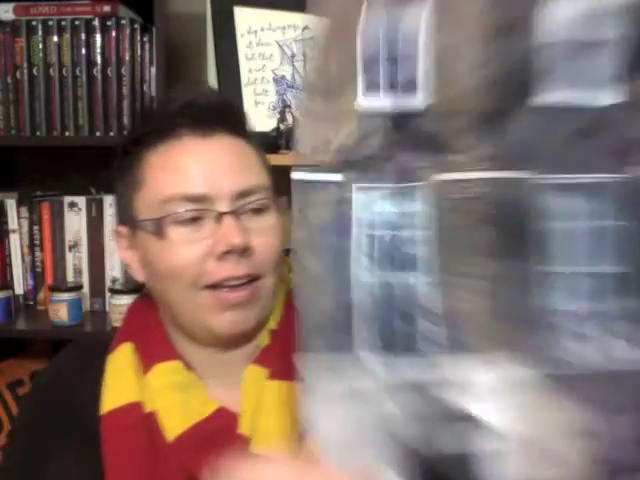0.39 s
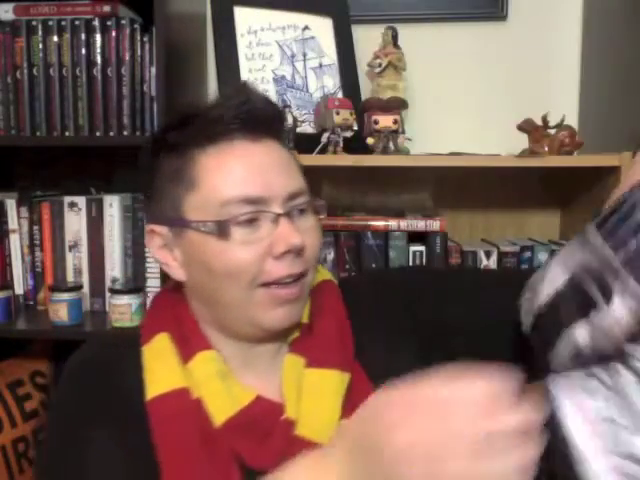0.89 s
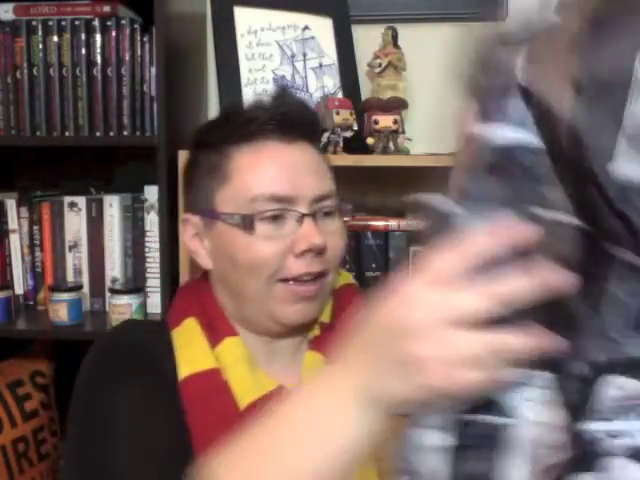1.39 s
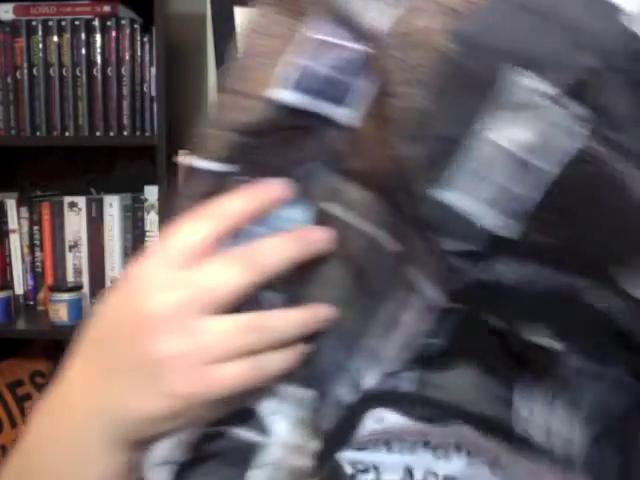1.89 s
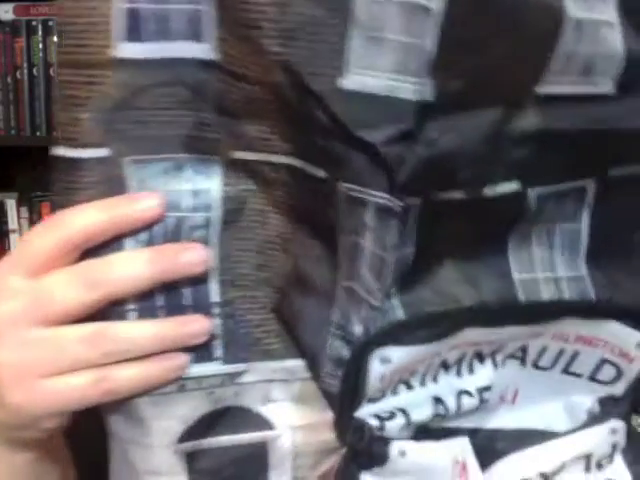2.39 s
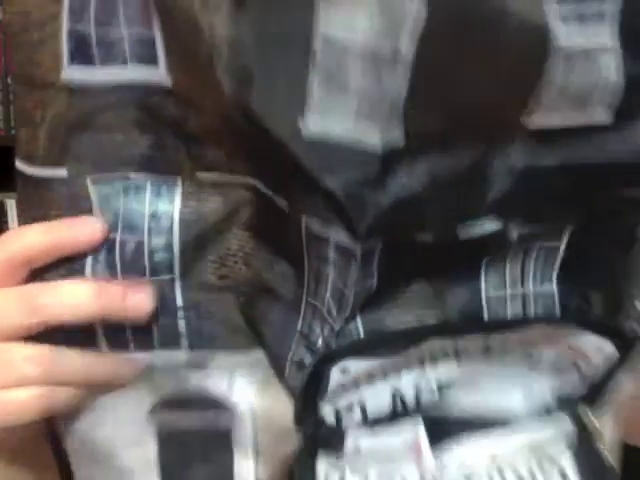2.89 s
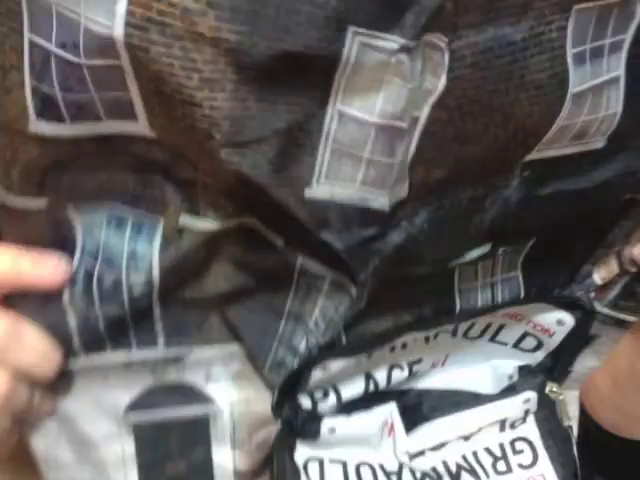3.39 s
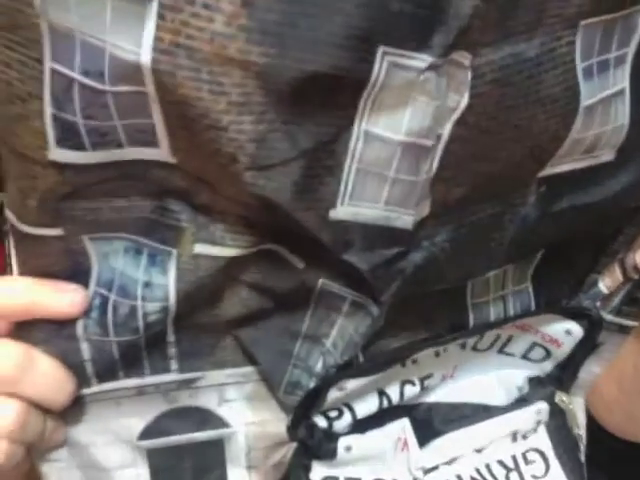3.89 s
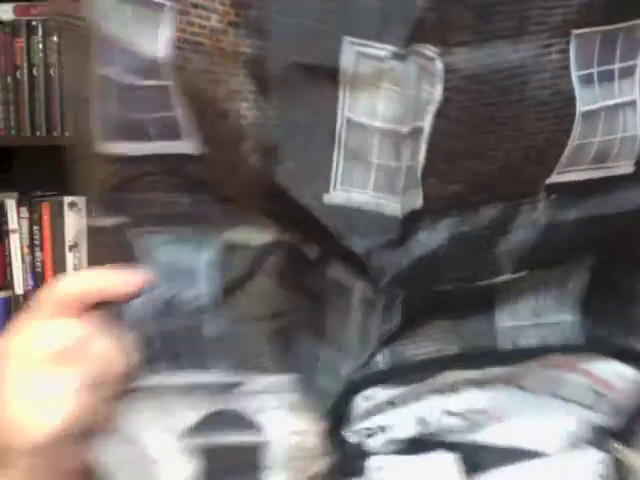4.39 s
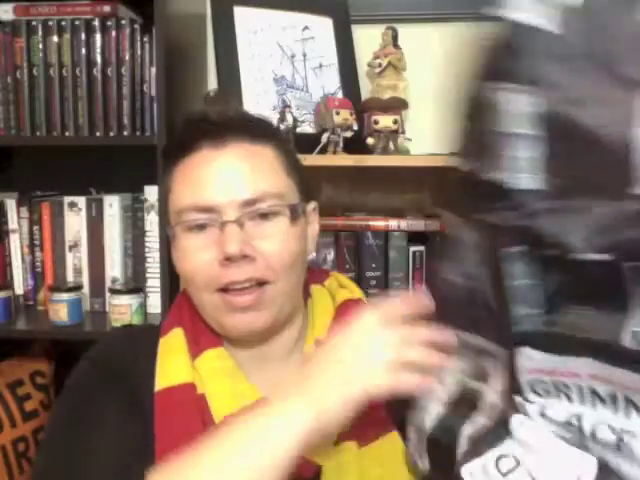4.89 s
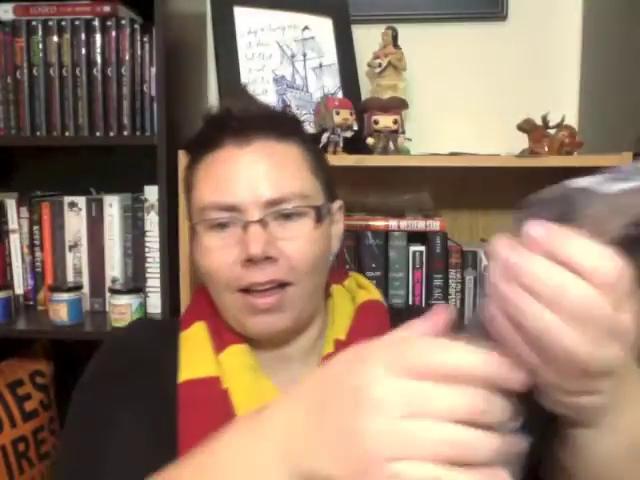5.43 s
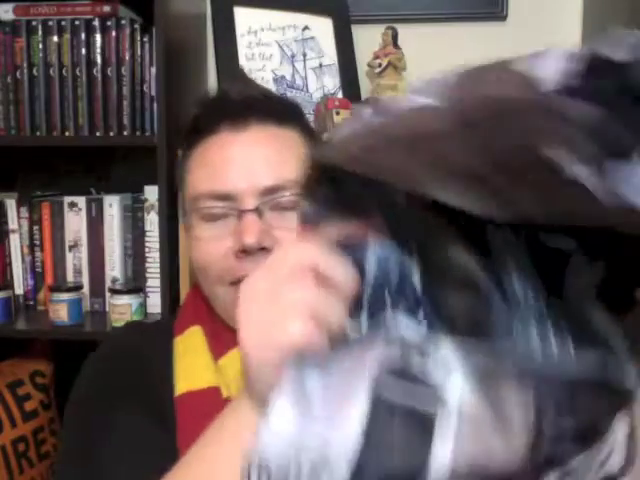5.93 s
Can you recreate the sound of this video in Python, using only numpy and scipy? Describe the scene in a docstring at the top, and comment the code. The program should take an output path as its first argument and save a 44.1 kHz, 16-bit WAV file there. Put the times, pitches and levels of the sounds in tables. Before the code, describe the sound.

Crisp, synthetic-sounding cloth rustles and crinkles near a thin, bass-light microphone indoors. Folds pop and snap, layers hiss over each other and panels give soft low flaps. The handling comes in separate bouts, with short gaps and a long hush just before the last third. Rustling then returns gently and swells into the busiest, loudest crumple, where taut weave chirps upward. Close reflections keep the space small and dry.

```python
"""In a small furnished room, a large stiff fabric bag is unfolded and shaken close to a laptop microphone.
Creases snap over as short rings with cracks and thumps; many small folds crackle as dense tuned grains.
Layers slide on each other with a bright, flickering hiss, and panels flap as low noise.
Now and then the taut weave squeaks on a gliding tone. Changing echoes and faint room noise surround it all."""
import sys
import numpy as np
from scipy import signal
from scipy.io import wavfile
from scipy.ndimage import uniform_filter1d

SR = 44100
rng = np.random.default_rng(int(sys.argv[2]) if len(sys.argv) > 2 else 0)


def unload_audio(sound):
    """Save the sound as a 16-bit wav file, at the path given as the first command line argument."""
    columns = np.transpose(np.atleast_2d(sound))
    # keep every value between -1 and 1, then stretch to whole-number steps
    steps = np.round(np.clip(columns, -1, 1) * 32767)
    wavfile.write(sys.argv[1], SR, steps.astype(np.int16))


def boost(x):
    """Linear amplitude factor 10**(x/20) for a level x in decibels (scalar or array-like)."""
    u = np.asarray(x, float) / 20
    return 10 ** u


N = 266496

# room noise spectrum, relative density: (frequency [Hz], level [dB])
AIR_SPECTRUM = [(30, -9), (125, 17), (250, 4.5), (800, -1), (1700, -4), (3500, -18), (6000, -8.5),
                (10000, -10.5), (17000, -19)]
AIR_DB = -80  # rms at the microphone
# reverb time of the room by band: (frequency [Hz], time to fall 60 dB [s])
WALL_DECAY = [(200, 0.12), (700, 0.12), (2000, 0.22), (5000, 0.2), (12000, 0.23)]
# reflections off nearby surfaces: (nominal delay [s], level [dB])
NEAR_ECHOES = [(.0021, -15.5), (.0054, -26.5), (.0092, -27), (0.015, -21.5)]
# microphone capsule behind its port: (frequency [Hz], gain [dB])
MIC_RESPONSE = [(20, -20.5), (55, -12.5), (120, 1.5), (300, 3), (5000, -1.78), (6800, -5.5), (8200, -9.5),
                (9700, -2), (11500, -4.5), (15700, -2.5), (16100, -21.5), (17200, -54.5)]

# panels that swing: (start [s], length [s], level [dB])
FLAPS_TIMED = [(.41, .2, -79), (.6, 0.032, -68), (1.125, 0.046, -60.5), (1.4, .02, -77), (1.6, 0.13, -53),
               (2.08, 0.042, -52.5), (2.94, .02, -60.5), (3.04, 0.047, -60), (3.15, 0.025, -57),
               (3.74, 0.025, -55.5), (4.59, .02, -60.5), (4.64, 0.35, -68), (4.93, 0.028, -56),
               (5.5, 0.29, -67.5), (5.78, 0.037, -67), (5.9, 0.052, -47)]
# lumps of pushed air, relative density: (frequency [Hz], level [dB])
FLAP_SPECTRUM = [(40, -30), (110, -6), (200, .1), (400, -6), (900, -30)]
SWING_S, REST_DB_PER_S = 0.0094, 300.5  # rise time, fall after the end
STIR_DB, STIR_PER_DB = -71, 0.94  # panels stir with any crumpling: level at -56 dB of large folds, slope

# one layer sliding along another: (start [s], length [s], hiss at the start [dB], hiss at the end [dB])
SLIDE_STROKES = [(0, .19, -54, -66), (.335, 0.22, -59, -58), (.59, .02, -54, -63), (.69, 0.029, -60, -57),
                 (.748, .04, -49, -61), (.855, .03, -64, -72), (.95, .03, -55, -70),
                 (1.06, 0.021, -71, -48), (1.288, .03, -69, -80), (1.39, .17, -43, -51.5),
                 (1.57, 0.045, -45.5, -48), (1.63, .12, -71, -49), (1.81, .02, -32, -65),
                 (2.02, .01, -58, -69), (2.085, .075, -50.5, -51), (2.165, 0.032, -62, -58),
                 (2.2, 0.26, -51, -57.5), (2.895, .02, -65.5, -85), (2.95, .11, -60.5, -54),
                 (3.07, 0.17, -46, -43), (3.27, .11, -59, -63), (3.725, 0.018, -65, -80),
                 (3.79, 0.017, -62, -86), (4.42, .015, -73.5, -85), (4.47, 0.1, -52.5, -59),
                 (4.585, .015, -62, -70), (4.635, 0.09, -62, -51), (4.74, 0.067, -56, -59),
                 (4.81, 0.17, -52, -54.5), (5.0, .23, -60, -64), (5.24, 0.018, -64, -75),
                 (5.3, .02, -68, -72), (5.35, .04, -66, -63), (5.44, 0.21, -56.5, -40),
                 (5.65, .16, -44, -40), (5.82, .11, -48.5, -33.5), (5.94, 0.073, -51, -49)]
# sliding hiss, relative density: (frequency [Hz], level [dB])
SLIDE_SPECTRUM = [(1200, -34.5), (2500, -13.5), (4400, -9.5), (7000, -8.5), (10000, -0.5), (13000, -6.5),
                  (17000, -13)]
GRIP_S, LET_GO_DB_PER_S = 0.0084, 899.5  # a stroke takes hold quickly and dies away after its end
RUB_DB = -26.5  # crumpling also rubs layers together, this far below the small folds

# taut weave, one list a squeak: (time [s], pitch [Hz], level [dB])
SQUEAK_PATHS = [
    [(4.398, 3760, -71.5), (4.404, 3820, -63), (4.415, 3960, -58), (4.428, 4000, -61)],
    [(4.402, 5000, -75), (4.41, 5050, -71), (4.424, 5000, -70)],
    [(4.42, 2210, -63), (4.424, 2200, -63), (4.434, 2100, -72)],
    [(5.758, 1637, -38), (5.764, 1685, -30), (5.785, 1897, -29.5), (5.8, 2165, -27.5), (5.81, 2526, -25),
     (5.822, 2770, -37)],
    [(5.87, 3730, -42), (5.88, 3510, -33), (5.888, 3560, -28), (5.895, 3700, -24)],
]

# how hard the cloth is crumpled, one list a movement:
# (time [s], small folds [dB], large folds against small [dB])
CRUMPLE_MOVES = [
    [(0, -48, -6), (.03, -48, -18), (.19, -46, -6), (.215, -61, -1.5), (.335, -51, -10.5),
     (.345, -42.5, -10), (.59, -48.5, -3.5), (.61, -45.5, -6), (.68, -51.5, -8), (.71, -53.5, 1),
     (.85, -51.5, -5.5), (.86, -47, -16), (1.02, -56.5, -4), (1.09, -46, -23), (1.118, -62, -2),
     (1.128, -46, -20), (1.28, -68.5, 5.5), (1.291, -54.5, 1), (1.385, -57.5, -5.5)],
    [(1.395, -47.5, -5), (1.423, -41, -15), (1.56, -46, -7.5), (1.6, -46.5, -3), (1.73, -49.5, -3),
     (1.81, -53, 3), (1.855, -68, -8), (1.865, -63, 14), (1.925, -83.5, 14)],
    [(2.0, -65.5, -3.5), (2.065, -61.5, 4), (2.078, -52, 7.5), (2.155, -43.5, -6), (2.171, -47.5, -11),
     (2.23, -45, -7.5), (2.3, -49, -10.5), (2.365, -40.5, -1), (2.413, -44.5, -8.5), (2.478, -51.5, -12),
     (2.49, -65, 12), (2.57, -70, 1), (2.69, -79.5, 5)],
    [(2.928, -74, -1), (2.936, -57, -8), (2.967, -49, 1), (3.059, -47.5, -13.5), (3.109, -40.5, -2.5),
     (3.175, -39.5, -5.5), (3.221, -40, -4), (3.273, -41, -9), (3.351, -48, 8.5), (3.38, -50, -3.5),
     (3.425, -75.5, 11.5)],
    [(3.5, -76, 7.5), (3.633, -64, -2.5), (3.655, -79, 1), (3.725, -67.5, 2), (3.8, -72.5, 4),
     (3.85, -73.5, 10.5), (3.86, -85, 8)],
    [(4.395, -80, 2.5), (4.46, -69.5, -2), (4.49, -58.5, -15), (4.59, -58, -15), (4.625, -75, -3),
     (4.636, -50.5, -3), (4.72, -45.5, -2), (4.795, -52.5, -1), (4.855, -50, 1.5), (4.957, -40.5, -3),
     (5.005, -51, -11), (5.1, -53, -13.5), (5.228, -53.5, -10.5), (5.237, -57.5, 8.5), (5.273, -55.5, 1.5),
     (5.377, -50, -6.5), (5.417, -56.5, -9)],
    [(5.455, -53, -8), (5.577, -44, -11.5), (5.635, -43.5, -7), (5.658, -50, -11), (5.667, -38, -11),
     (5.805, -35, -13), (5.829, -42, -7.5), (5.917, -37, 0), (5.951, -37, -9.5), (6.04, -42.5, -9)],
]
# crumpling cloth, relative density: (frequency [Hz], level [dB])
CLOTH_SPECTRUM = [(90, -30), (160, -10.5), (320, -11), (500, -1), (1200, 0), (2400, 3), (4600, 0.5),
                  (7000, -4.5), (12000, -28), (17000, -31)]
# fold pitches are spread by octaves, so the treble is lifted: (frequency [Hz], gain [dB])
OCTAVE_LIFT = [(100, -2.5), (10000, 4.0)]

# creases that snap over, the last two columns against the peak:
# (time [s], peak of the body [dB], ring pitch [Hz], bright edge [dB], settling [dB])
CREASE_SNAPS = [(0.0502, -30, 3440, -30, -27), (0.128, -27.5, 1450, -27, -18),
                (.347, -16.5, 2800, -29, -19), (0.3531, -16.5, 3730, -39, -28),
                (0.3563, -27, 3000, -35, -23), (.381, -20, 3800, -34, -20), (0.5952, -18, 2600, -24, -21.5),
                (0.749, -27.5, 1530, -32, -25), (0.8072, -28.5, 1060, -38, -29),
                (0.8583, -12, 3020, -20, -24), (0.865, -26, 2200, -26, -22), (.9166, -38, 3300, -33, -27),
                (0.9301, -28.5, 2010, -36, -15), (0.9526, -10.5, 4500, -35, -28.5),
                (1.0298, -40, 1730, -30, -16), (1.0535, -27, 2050, -34, -15), (1.0744, -18, 2230, -25, -13),
                (1.1235, -23.5, 2920, -44, -19), (1.1272, -22.5, 1420, -46, -25),
                (1.149, -23, 1900, -45, -21), (1.1715, -30, 1640, -39, -19), (1.2464, -41, 1950, -36, -16),
                (1.2653, -33, 1860, -42, -17.5), (1.2844, -34.5, 1480, -40, -20),
                (1.2919, -25.5, 1680, -30, -19), (1.4115, -26.5, 1800, -22, -15),
                (1.4745, -13, 2090, -20.5, -25), (1.4813, -24.5, 3300, -29, -7.5),
                (1.5136, -20.5, 4300, -25, -27), (1.5787, -32, 2400, -20, -15),
                (1.633, -15, 3000, -19, -28), (1.654, -11.5, 2450, -13, -18),
                (1.6863, -14, 1890, -20.5, -18), (1.6937, -21, 2000, -22, -31),
                (1.7228, -6, 3880, -33, -33), (1.7313, -21, 4200, -18, -34),
                (1.7824, -22.5, 2750, -40, -25), (1.8135, -12.5, 2140, -27, -45),
                (1.8181, -21, 2900, -22, -35), (1.8608, -9, 2960, -52, -26),
                (1.8645, -18.5, 3000, -37, -31), (2.0024, -46.5, 840, -35, -31),
                (2.041, -37, 2300, -37, -30), (2.0503, -38, 935, -43, -28), (2.078, -21, 2170, -40, -19),
                (2.0957, -20, 2430, -22, -16), (2.203, -30, 2310, -26, -20), (2.215, -28, 2420, -27, -23),
                (2.238, -24.5, 1960, -30, -16), (2.2452, -26.5, 2200, -26, -14),
                (2.3524, -24.5, 1810, -32, -23), (2.482, -25, 1247, -52, -35),
                (2.5156, -29.5, 1900, -52, -38), (2.5189, -35, 700, -49, -38.5),
                (2.8304, -50, 2060, -40, -25), (2.8973, -18, 2070, -31.5, -22),
                (2.9747, -30.5, 2320, -32, -14.5), (3.0693, -16.5, 2230, -39, -32),
                (3.097, -19.5, 1620, -22, -11), (3.11, -9.5, 2630, -27, -27), (3.1227, -25, 1500, -29, -11),
                (3.1773, -6.5, 2670, -25, -24), (3.1802, -9.5, 2440, -32, -24),
                (3.1857, -4.5, 3150, -36, -28), (3.2032, -22, 2100, -9, -30),
                (3.2123, -14.5, 5130, -19, -30), (3.2268, -17.5, 2470, -30, -26),
                (3.2741, -18, 2390, -29, -33), (3.2972, -30, 1040, -28, -20),
                (3.309, -14.5, 1960, -38, -30), (3.3282, -24, 2660, -35, -30),
                (3.338, -13.5, 2430, -34, -32), (3.3576, -22.5, 2040, -29, -18),
                (3.423, -33.5, 2130, -42, -34), (3.4921, -37.5, 790, -46, -26),
                (3.5376, -45, 810, -40, -16), (3.5419, -34, 2050, -45, -24),
                (3.5977, -49.5, 1000, -38, -28), (3.625, -45.5, 1710, -31.5, -24),
                (3.7296, -14, 1910, -40, -24), (3.7773, -25.5, 2360, -38, -14.5),
                (3.7935, -20, 1470, -38, -34), (3.7967, -23, 1980, -31, -36),
                (3.8322, -29.5, 2090, -44, -27.5), (3.9596, -46, 1530, -44, -19.5),
                (4.2, -54.5, 2015, -40, -28), (4.4237, -39, 3040, -34, -21), (4.472, -32.5, 3530, -24, -30),
                (4.4865, -32.5, 5000, -22, -19), (4.5906, -18.5, 4560, -45, -21.5),
                (4.595, -22, 2100, -44, -33), (4.6406, -27, 4350, -37, -32), (4.6437, -27, 1900, -30, -24),
                (4.676, -29, 1070, -29, -14), (4.7131, -26.5, 2110, -13.5, -21),
                (4.759, -24.5, 2780, -38, -23), (4.809, -25, 1320, -37, -29), (4.8267, -28, 2330, -30, -26),
                (4.8571, -26, 880, -26, -8), (4.8611, -27.5, 950, -15, -22), (4.9138, -22, 2090, -31, -15),
                (4.941, -20.5, 1510, -30, -26), (4.944, -15.5, 1810, -28, -14),
                (4.9522, -27.5, 1920, -38, -4), (5.1088, -33, 3260, -23, -16), (5.159, -32, 1900, -33, -20),
                (5.1792, -29, 2850, -31, -20), (5.2444, -27.5, 2470, -37, -20),
                (5.248, -32, 2020, -37, -30), (5.2828, -41, 1400, -41, -32), (5.2966, -30, 2050, -45, -28),
                (5.3366, -28, 4300, -44, -28), (5.4429, -35, 3280, -28, -24),
                (5.5446, -28.5, 1920, -19, -17), (5.5767, -25, 3540, -29, -32),
                (5.586, -21, 1490, -28, -22), (5.6663, -23.5, 2400, -25, -20),
                (5.6777, -29, 2170, -25, -23), (5.697, -14.5, 4170, -33, -32), (5.705, -21, 3600, -22, -26),
                (5.713, -19, 3200, -26, -14), (5.761, -12, 2420, -32, -29), (5.8388, -18, 3370, -22, -21),
                (5.9021, -11.5, 2270, -22, -19), (5.9081, -10.5, 2170, -23, -30),
                (5.9169, -11, 3600, -19, -26), (5.9868, -25, 1500, -33, -26), (6.0125, -24, 1400, -27, -22)]
# thump of a -24 dB snap ringing at 2 kHz [dB], its slope per dB of snap, its slope per octave of ring [dB]
THUMP_DB, THUMP_PER_DB, THUMP_PER_OCTAVE = -49.5, 0.51, -3


def evened(x):
    """Scales to an rms of 1."""
    return x / np.sqrt(np.mean(x ** 2) + 1e-20)


def read(points, hz):
    """Reads a curve at given frequencies, straight along log frequency."""
    f, value = np.transpose(points)
    return np.interp(np.log(hz + 1), np.log(f + 1), value)


def colour(x, points):
    """Minimum-phase filter with the given gain curve, so nothing sounds ahead of its cause."""
    gain_db = np.maximum(read(points, np.fft.rfftfreq(2048, 1 / SR)), -90)
    log_gain = np.log(boost(gain_db))
    circle = np.concatenate([log_gain, log_gain[-2:0:-1]])
    taps = np.fft.ifft(np.exp(np.conj(signal.hilbert(circle)))).real
    return signal.oaconvolve(x, taps)[:N]


def wander(cutoff_hz):
    """Random drift of rms 1: white noise through a lowpass."""
    return evened(signal.lfilter(*signal.butter(2, cutoff_hz, fs=SR), rng.standard_normal(N)))


def ring(hz, cycles, size=600):
    """A patch of cloth that springs and dies within a few cycles."""
    t = np.arange(size) / SR
    attack = np.minimum(t * hz, 1)  # one cycle long
    return np.sin(2 * np.pi * hz * t) * np.exp(-t * hz / cycles) * attack


def hiss(points, patchy_db):
    """Noise of a given spectrum whose level drifts in small patches of time and pitch."""
    real, imaginary, patches = rng.standard_normal((N // 128 + 6, 257, 3)).T
    patches = uniform_filter1d(patches, 10, 0)
    patches = evened(uniform_filter1d(patches, 10, 1))
    level_db = read(points, np.fft.rfftfreq(512, 1 / SR))[:, None] + patchy_db * patches
    spectrum = (real + 1j * imaginary) * boost(level_db)
    return evened(signal.istft(spectrum, nperseg=512, noverlap=384)[1][:N])


def bursts(rows, rise_s, fall_db_per_s):
    """Gain of movements that rise, glide from a first level to a last and die away."""
    t, power = np.arange(N) / SR, np.zeros(N)
    for s, length, *db in rows:
        level = np.interp(t, [s, s + length], [db[0], db[-1]])
        level -= fall_db_per_s * np.maximum(t - s - length, 0)
        power += (boost(level) * np.clip((t - s) / rise_s, 0, 1)) ** 2
    return np.sqrt(power)


def crumpled():
    """Level in dB of the small folds and of the large folds at every sample."""
    s, small, large = np.concatenate(CRUMPLE_MOVES).T
    t = np.arange(N) / SR
    return np.interp(t, s, small), np.interp(t, s, small + large)


def room_air():
    """Room noise: a faint, nearly even hiss with its own spectrum."""
    return boost(AIR_DB) * hiss(AIR_SPECTRUM, 0.89)


def echo(tail_db):
    """A few near reflections over sparse taps whose bands die at their own speed."""
    taps = np.zeros(SR // 2)
    at = np.arange(120, SR // 2 - 20, 20)
    taps[at + rng.integers(0, 20, len(at))] = rng.choice([-1., 1.], len(at))
    hz, t, bands = signal.stft(taps, SR, nperseg=256)
    decay = boost(-60 * t / read(WALL_DECAY, hz)[:, None])
    tail = signal.istft(bands * decay, SR, nperseg=256)[1]
    tail *= boost(tail_db) / np.linalg.norm(tail)
    for s, db in NEAR_ECHOES:
        tail[round(s * SR * rng.uniform(.8, 1.2))] += boost(db)
    return tail


def room(x, tail_db=-12):
    """The bag keeps moving, so the paths to the walls change: three echoes take turns."""
    turn = 2 * np.pi * 2.3 * np.arange(N) / SR
    wet = np.zeros(N)
    for k in range(3):
        share = np.sqrt(2 / 3) * np.cos(turn + k * np.pi / 3)  # the three powers add up to 1
        wet += signal.fftconvolve(x * share, echo(tail_db))[:N]
    return x + wet


def flapping():
    """Panels push air in lumps: low noise that swells with each swing and stirs with the crumpling."""
    stir = boost(STIR_DB + STIR_PER_DB * (crumpled()[1] + 56))
    gain = np.hypot(bursts(FLAPS_TIMED, SWING_S, REST_DB_PER_S), stir)
    return gain * boost(2.5 * wander(14)) * hiss(FLAP_SPECTRUM, 2.2)


def sliding():
    """Layer on layer: fine bright hiss that flickers with the grip."""
    grit = rng.standard_normal(N) * boost(4.1 * wander(900))
    rub = boost(crumpled()[0] + RUB_DB)
    gain = np.hypot(bursts(SLIDE_STROKES, GRIP_S, LET_GO_DB_PER_S), rub)
    gain = gain * boost(1.5 * wander(25))
    gritty = evened(colour(grit, SLIDE_SPECTRUM))
    return gain * evened(gritty + .6 * hiss(SLIDE_SPECTRUM, 1.6))


def squeaks():
    """Taut weave sticks and slips at a gliding, slightly rough rate."""
    out, t = np.zeros(N), np.arange(N) / SR
    for rows in SQUEAK_PATHS:
        s, hz, db = np.transpose(rows)
        on = (t >= s[0]) & (t < s[-1])
        pitch = np.interp(t[on], s, hz)
        rough_pitch = pitch * (1 + .012 * wander(700)[on])
        turn = 2 * np.pi * np.cumsum(rough_pitch) / SR
        overtone = boost(-10) / (1 + (pitch / 3100) ** 12)  # only low squeaks carry one
        slips = np.sin(turn) + overtone * np.sin(2 * turn)
        level = boost(np.interp(t[on], s, db) + 3.0 * wander(340)[on])
        out[on] += level * slips * signal.windows.tukey(on.sum(), .25)
    return out


def crackle(per_s=4000, spread_db=4.0, clump_db=6.0, cycles=0.79, count=24):
    """Small folds buckle in clumps, each at one of count pitches; a few are large."""
    size = boost(spread_db * np.minimum(rng.exponential(1, N), 5)) * rng.choice([-1, 1], N)
    chance = per_s / SR * boost(clump_db * wander(45))
    size *= rng.random(N) < chance
    fold = rng.integers(0, count, N)
    out = np.zeros(N)
    for k, hz in enumerate(np.geomspace(250, 11000, count)):
        grain = evened(ring(hz, cycles))
        out += signal.oaconvolve(size * (fold == k), grain)[:N]
    return evened(out)


def crumpling():
    """Crackle over the soft rustle of threads; large folds give the low part, small folds the high part."""
    folds = evened(colour(colour(crackle(), OCTAVE_LIFT), CLOTH_SPECTRUM))
    rustle = hiss(CLOTH_SPECTRUM, 2.2) * boost(2.2 * wander(30))
    both = boost(-1.5) * folds + boost(-5.5) * rustle
    large = signal.filtfilt(*signal.butter(2, 1800, fs=SR), both)
    small_db, large_db = crumpled()
    return boost(large_db) * evened(large) + boost(small_db) * evened(both - large)


def snaps():
    """Each crease: a short ring, a ragged crack, a bright edge, a low thump; then the cloth around it settles."""
    size = 4000
    out, t = np.zeros(N + size), np.arange(size) / SR
    noise = rng.standard_normal((len(CREASE_SNAPS), 4, size))
    ratios = rng.uniform(1.4, 2.3, len(CREASE_SNAPS))  # second ring against the first
    middle = signal.butter(2, [700, 5500], "bandpass", fs=SR)
    open_air = signal.butter(2, 130, "highpass", fs=SR)  # a thin panel radiates little deep bass
    dull = signal.butter(3, 6800, fs=SR)
    top = signal.butter(2, [7800, 12300], "bandpass", fs=SR)
    thump = ring(392, 1.9, size) + 0.43 * ring(170, 1.35, size)
    thump = signal.lfilter(*open_air, thump)
    for (s, db, hz, edge_db, settle_db), (a, b, c, d), ratio in zip(CREASE_SNAPS, noise, ratios):
        # a crease cracks around its own pitch
        near = signal.butter(1, [hz / 2.2, min(hz * 2.2, 9000)], "bandpass", fs=SR)
        crack = signal.lfilter(*near, a * np.minimum(t / 0.00007, 1) * np.exp(-t / 0.0013))
        rings = 1.4 * ring(hz, 1.7, size) + .6 * ring(hz * ratio, 2.2, size)
        body = signal.lfilter(*dull, rings + 1.1 * crack)
        gritty = c * boost(21.6 * uniform_filter1d(d, size=12))
        settling = boost(settle_db) * gritty * np.exp(-t / 0.016) * np.minimum(t / .002, 1)
        edge = signal.lfilter(*top, b * np.exp(-t / 0.00033))
        edge = edge / np.std(edge[:100])  # level over the first 100 samples
        edge = edge + signal.lfilter(*top, 2.2 * settling)
        thump_db = THUMP_DB + THUMP_PER_DB * (db + 24) + THUMP_PER_OCTAVE * np.log2(hz / 2000)
        snap = body / abs(body).max() + signal.lfilter(*middle, settling) + boost(edge_db) * edge
        out[round(s * SR):][:size] += boost(db) * snap + boost(thump_db) * thump
    return out[:N]


def scene():
    """All sounds of the bag go through the room; the room noise lies underneath."""
    bag = crumpling() + sliding() + flapping() + snaps() + squeaks()
    return (room(bag) + room_air())[None]


def low_pass(x):
    """Removes everything above the highest recorded frequency."""
    return signal.sosfilt(signal.butter(12, 17000, fs=SR, output="sos"), x)


def record(dry):
    """The small microphone loses the bass and has a dip and a bump in the treble."""
    mix = colour(dry[0], MIC_RESPONSE)[None]
    return low_pass(mix)


dry = scene()
out = record(dry)
unload_audio(out)
```